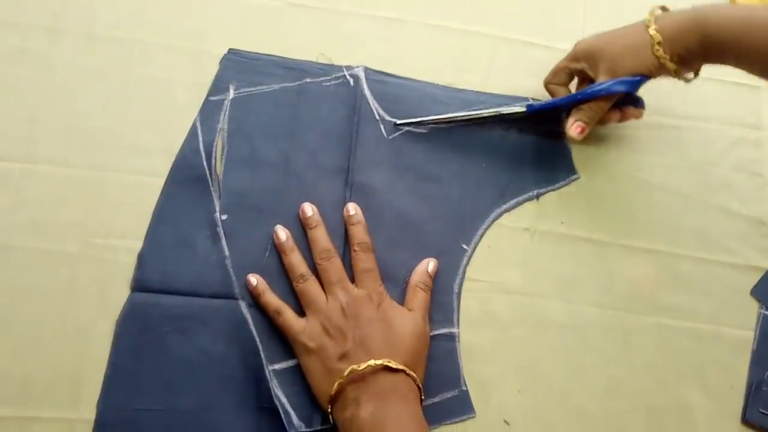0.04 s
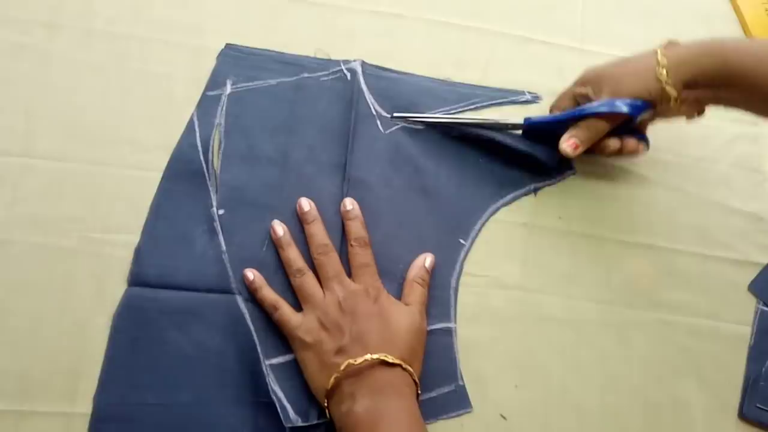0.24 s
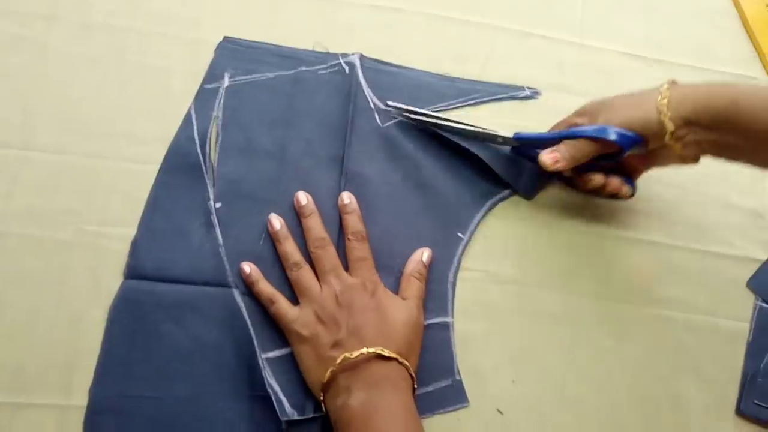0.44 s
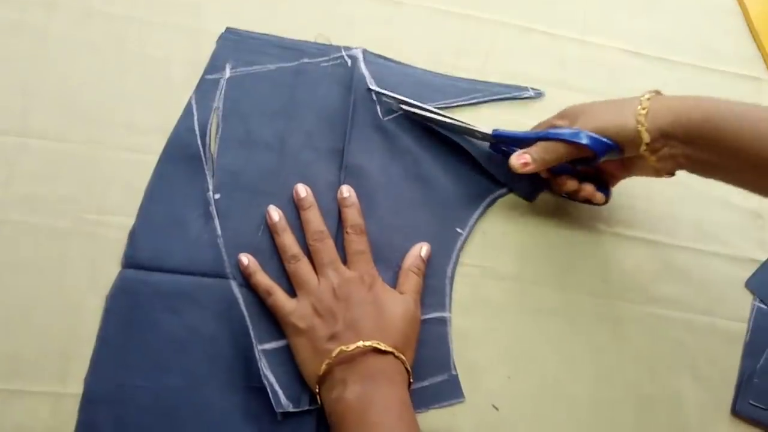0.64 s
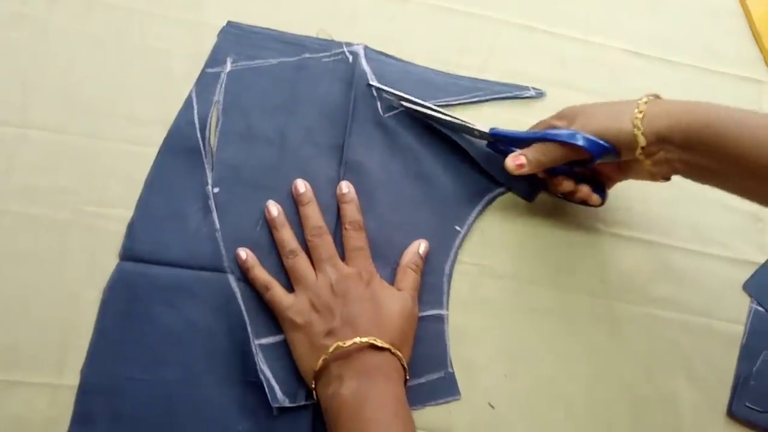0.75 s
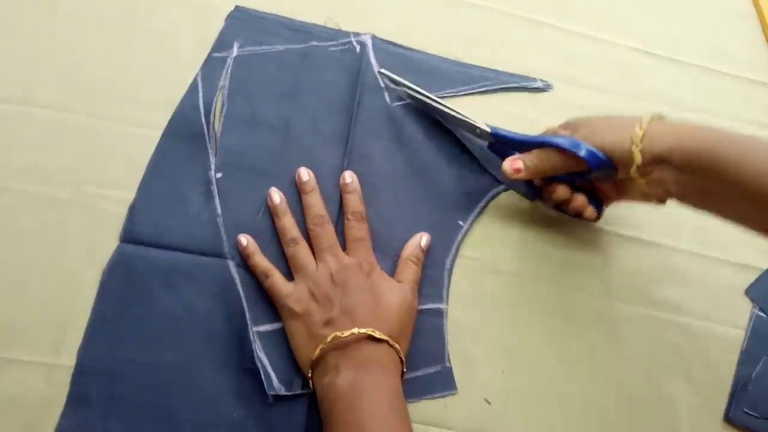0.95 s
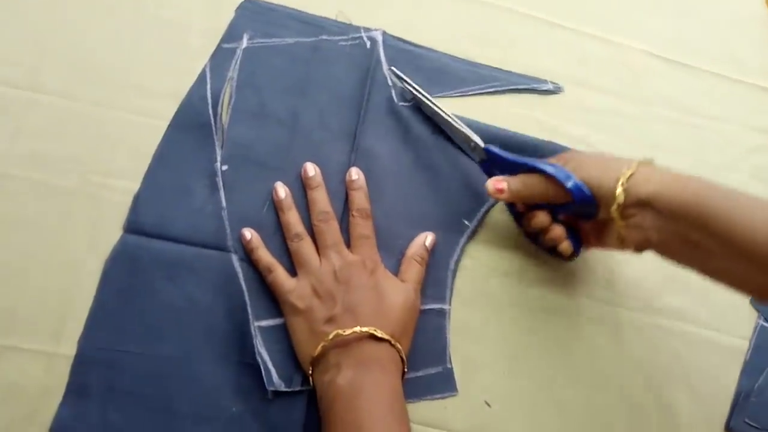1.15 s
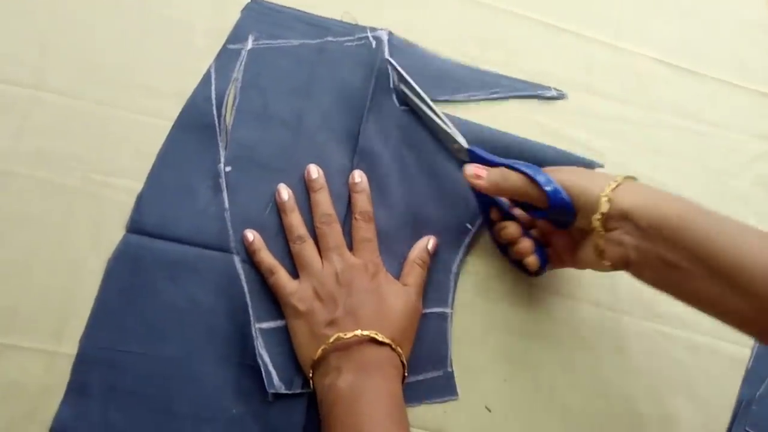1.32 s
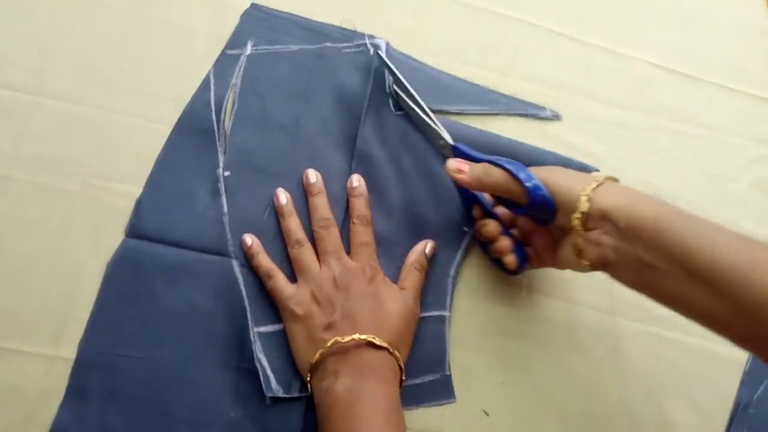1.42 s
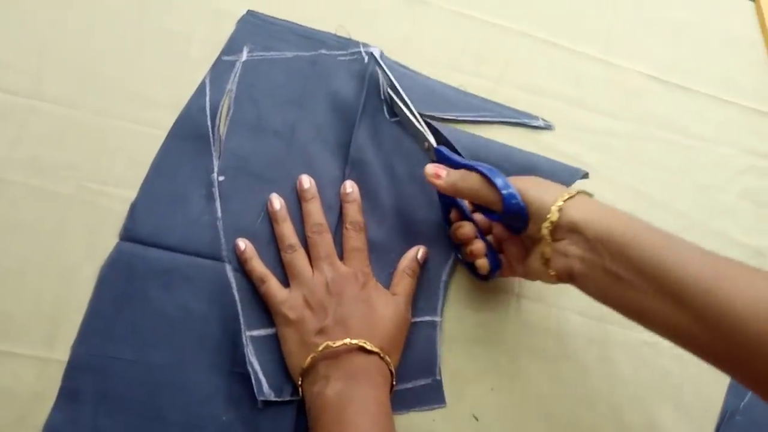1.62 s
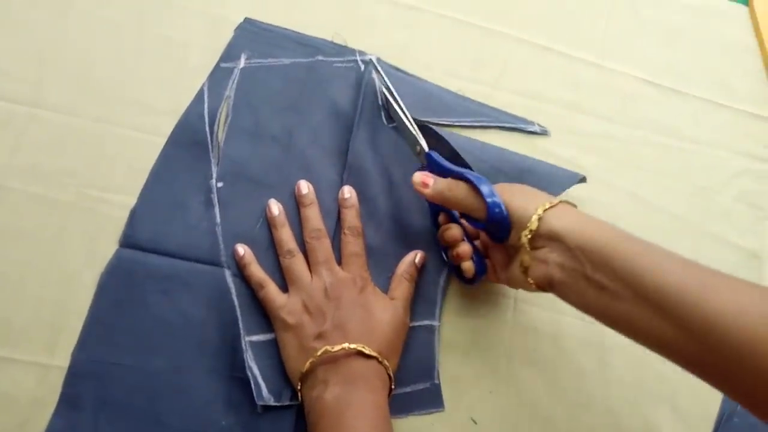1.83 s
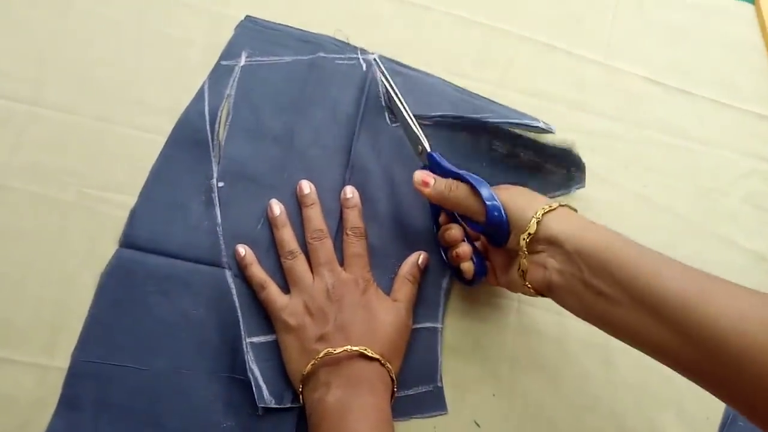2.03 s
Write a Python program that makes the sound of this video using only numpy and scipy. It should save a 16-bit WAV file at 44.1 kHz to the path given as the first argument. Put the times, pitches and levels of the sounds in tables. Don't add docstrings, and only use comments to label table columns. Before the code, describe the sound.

Tailoring scissors cut cloth on a hollow table in three uneven bursts of crunchy snips, with steel rubbing, dragging cloth and dull hand thumps between them, picked up close by a phone in a quiet room.

```python
import sys
import numpy as np
from scipy import signal
from scipy.fft import rfft, irfft
from scipy.io import wavfile
from scipy.ndimage import uniform_filter1d

SR = 44100
rng = np.random.default_rng(int(sys.argv[2]) if len(sys.argv) > 2 else 0)


def wrap_up_sound(samples):
    columns = np.atleast_2d(samples).T
    tamed = np.clip(columns, -1, 1)
    steps = np.round(tamed * 32767).astype(np.int16)
    wavfile.write(sys.argv[1], SR, steps)


def gain_from_db(level_db):
    decades = np.asarray(level_db, float) / 20
    return 10 ** decades


N = 91507

# f/Hz, level/dB
ROOM_TONE = [(25, -26), (55, -1.5), (105, 5.5), (190, -9), (330, -24), (1500, -23), (7900, -49)]
# t/s, f/Hz
PIVOT_SQUEAK = [
    (1.944, 14250),
    (1.975, 14950),
    (2.0, 14600),
    (2.038, 13750),
]
# t/s, level/dB, share of the low blade notes/dB
BLADE_RUB = [(0, -60.5, -9), (.2, -70.5, 1), (.38, -69, -6.5), (.45, -73, -3.5), (.66, -74.5, -2.5),
             (.69, -67, 1), (1.28, -65.5, -2.5), (1.31, -62.5, -23), (1.35, -64.5, -1), (1.5, -68, -1.5),
             (1.56, -70.5, -13), (1.621, -63.5, -19), (1.645, -67, 6), (1.7, -67, 5), (1.74, -65.5, 1),
             (1.93, -61, -2), (2.07, -68, 5)]
# t/s, level/dB
CLOTH_DRAG = [(0, -54.5), (.12, -59.5), (0.362, -64), (0.682, -64.5), (0.781, -58.5), (.95, -61),
              (1.13, -58.5), (1.218, -63.5), (1.7, -62.5), (1.9, -62), (2.07, -61)]
# t/s, level/dB
FIBRE_CRACKLE = [(0.77, -105), (0.83, -87), (0.96, -91), (0.985, -105), (1.0, -100), (1.03, -77),
                 (1.12, -87), (1.16, -105), (1.7, -105), (1.73, -91), (1.9, -80), (1.95, -105)]
# t/s, level/dB, length/s
EDGE_SLIDES = [
    (0.365, -71.5, 0.044),
    (1.222, -68, 0.049),
]
# t/s, tip level/dB, body level/dB,
# length/s, body f/Hz
CLOTH_BRUSHES = [
    (0.36, -86.5, -66, 0.037, 5000),
    (1.217, -81.5, -65, 0.032, 4350),
    (1.243, -75.5, -70, 0.024, 4900),
    (0.782, -82, -74, 0.016, 4800),
    (0.875, -82, -82, 0.015, 5500),
    (1.932, -100, -76.5, 0.07, 1970),
    (1.615, -105, -73, 0.064, 2810),
    (1.834, -100, -56, 0.0076, 3930),
    (2.031, -95, -67, 0.022, 4140),
]
# t/s, level/dB, f/Hz, length/s
HAND_THUMPS = [(0.014, -44.5, 170, 0.053), (0.044, -35.5, 166.5, 0.033), (0.089, -50, 162, 0.058),
               (0.129, -49, 105, 0.014), (0.199, -54.5, 142.7, 0.11), (0.291, -41.5, 143.2, 0.037),
               (0.329, -53, 173.4, 0.044), (0.429, -60, 155, 0.045), (0.51, -59, 105, 0.05),
               (0.532, -53.5, 97, 0.021), (0.619, -81.5, 101, 0.028), (0.763, -51.5, 62, 0.051),
               (0.825, -36, 109, 0.037), (0.859, -40, 67, 0.039), (0.889, -49.5, 113, 0.11),
               (1.013, -37, 167, 0.051), (1.04, -42.5, 88.5, 0.068), (1.129, -42.5, 158, 0.022),
               (1.192, -46, 80, 0.038), (1.244, -42.5, 80.4, 0.025), (1.292, -47.5, 64.8, 0.067),
               (1.332, -53, 55.3, 0.091), (1.551, -49.5, 103.4, 0.046), (1.634, -48, 121, 0.074),
               (1.725, -48, 108.9, 0.11), (1.799, -43, 137.3, 0.064), (1.841, -41.5, 100, 0.057),
               (1.861, -38, 106.6, 0.053), (1.894, -34.5, 149, 0.016), (1.929, -43.5, 125.5, 0.036)]
# t/s, blade-tip level/dB, blade-body level/dB, table level/dB
QUICK_BITES = [(0.0164, -49, -43, -33.5), (0.0466, -41, -41.5, -33), (0.0742, -60, -69, -44),
               (0.142, -38, -53, -40.5), (0.2778, -40.5, -55, -42), (0.908, -47, -60, -41.5),
               (0.9443, -54, -69, -46), (1.0051, -48, -54.5, -44.5), (1.0518, -51, -48.5, -36),
               (1.1007, -47.5, -58, -50.5), (1.7624, -47, -72, -53.5), (1.836, -46, -59, -52),
               (1.8498, -60, -60, -87), (1.8604, -42, -45, -48.5), (1.9001, -45, -51.5, -47)]
QUICK_LENGTHS = [13, 11, 11, 12, 9, 12, 4, 12, 6, 9, 6, 6, 4, 11, 6]
# t/s, blade-tip level/dB, blade-body level/dB, table level/dB
LONG_BITES = [
    (0.8246, -36, -57, -37.5),
    (0.848, -44.5, -56.5, -41),
    (1.0203, -41, -46, -32.5),
    (1.061, -38, -49, -38),
    (1.08, -51, -59.5, -41),
    (1.7324, -41.5, -68, -49.5),
    (1.7857, -41, -60.5, -48),
    (1.8075, -51, -71, -77),
    (1.8773, -42.5, -45.5, -47.5),
]
LONG_LENGTHS = [18, 22, 16, 17, 13, 22, 16, 22, 20]
# shares of blade edge/dB, low, middle and top table notes/dB
BITE_COLOURS = [(-3.5, 2.5, 0, 4.5), (-5, 1, -13, -2), (-4, -6, -6, -2.5), (0, -0.5, -0.5, -4.5),
                (7.5, 1.5, -7.5, 6), (1, 3.5, -6, -14), (2, -3, 2, -12), (0, 1, 0, -4), (-1, 2, -3, -3),
                (-1, -2, -1, -6), (-5, 1, 0, -2), (-8, 1, 1, -3), (-9, 0, 5, -6), (-5, -3.5, -3.5, -2),
                (-3, 4, 0, -19), (-5, -5.5, 3.5, -3.5), (-7, -0.5, -2, 0.5), (-0.5, -6.5, 7, 3.5),
                (9.5, 2, -2, -1), (-1, -3, -18, -3), (-13, 3.5, -3.5, -1.5), (-15, 0, 1.5, -0.5),
                (-10, -3, -5, 0), (0.5, 0, 2, -6)]
# f/Hz, width/Hz, level/dB
TIP_NOTES = [(10600, 770, -5), (11480, 270, -6), (12100, 640, -6), (13920, 450, -2.5), (15380, 770, 3.5),
             (15070, 740, 4.5)]
# f/Hz, width/Hz, level/dB
BLADE_NOTES = [(2745, 246, -12.5), (3042, 190, -11.5), (3347, 250, -7), (4075, 370, -3), (4540, 147, 1.5),
               (4846, 340, 0.5), (5148, 326, 3), (5630, 110, -9), (5902, 44, -12.5), (6265, 55, -12.5)]
# f/Hz, width/Hz, level/dB
EDGE_NOTES = [(1900, 380, -19.5), (6486, 600, -2), (7790, 280, -15), (8960, 980, -12.5)]
# f/Hz, width/Hz, level/dB
TABLE_NOTES = [(170, 66, 0), (278, 61, 3.5), (427, 46, 0), (547.6, 41, -13.5), (666, 34, -7),
               (898.4, 45, -6.5), (934, 36, -16.5)]
# f/Hz, width/Hz, level/dB
BOARD_NOTES = [(65, 25, -8), (106, 20, 0), (153, 35, -3)]
# f/Hz, width/Hz, level/dB
CLOTH_NOTES = [(201.7, 36, -1), (268.7, 73, -6.5), (433, 94, -7), (559.5, 63, -9), (678, 44, -7),
               (764.5, 70, -8), (885, 83, -12.5), (1131, 110, -16.5), (1334, 70, -24), (1636, 100, -27)]
# f/Hz, width/Hz, level/dB
FIBRE_NOTES = [(11350, 350, -8), (13500, 600, -7), (14550, 320, -0.5)]
# f/Hz, width/Hz, level/dB
BRUSH_UPPER_NOTE = (6040, 320, -10.5)


def unit(x):
    return x / np.sqrt(np.mean(x ** 2) + 1e-30)


def ring(x, hz, width):
    b, a = signal.iirpeak(min(hz, 0.45 * SR), hz / width, fs=SR)
    return signal.lfilter(b, a, x)


def body(x, notes, colour_db=0):
    out = 0
    levels_db = np.array(notes)[:, 2] + colour_db
    for k, (hz, width, _) in enumerate(notes):
        tone = ring(ring(x, hz, width), hz, 3 * width)
        out = out + (-1) ** k * gain_from_db(levels_db[k]) / np.sqrt(width) * tone
    return out


def walk(rate):
    hold = int(SR / rate)
    steps = np.repeat(rng.standard_normal(N // hold + 1), hold)
    return 1.3 * uniform_filter1d(uniform_filter1d(steps, hold), hold)[:N]


def add(out, s, x):
    i = max(int(s * SR), 0)
    out[i:i + len(x)] += x[:N - i]


def strike(push, notes, db, length_s, colour_db=2.5):
    x = body(push, notes, colour_db * rng.standard_normal(len(notes)))
    main_part = x[:int((length_s + 0.004) * SR)]
    return gain_from_db(db) * x / np.sqrt(np.mean(main_part ** 2))


def friction(notes, flicker_db, rate, tilt_db):
    out = 0
    for (hz, width, db), extra_db in zip(notes, tilt_db):
        grit = rng.standard_normal(N) * gain_from_db(2 * rng.exponential(size=N))
        tone = unit(ring(ring(grit, hz, width), hz, 3 * width))
        out = out + gain_from_db(db + extra_db + flicker_db * walk(rate)) * tone
    return out


def room():
    f = np.maximum(np.fft.rfftfreq(N, 1 / SR), 1)
    hz, db = np.array(ROOM_TONE).T
    spectrum = rfft(rng.standard_normal(N)) * gain_from_db(np.interp(np.log(f), np.log(hz), db))
    tone = unit(irfft(spectrum, N))
    hiss = unit(body(rng.standard_normal(N), [(15440, 730, 32), (9300, 7000, 3.0)]))
    return gain_from_db(-66 + 2 * walk(16)) * tone + gain_from_db(-101 + 0.75 * walk(9.4)) * hiss


def squeak(t):
    s, hz = np.array(PIVOT_SQUEAK).T
    shape = np.clip(np.minimum(t - s[0], s[-1] - t) / 0.015, 0, 1)
    whistle = np.sin(2 * np.pi * np.cumsum(np.interp(t, s, hz)) / SR)
    return gain_from_db(-91 + 2.5 * walk(60)) * shape * whistle


def rubbing(t):
    rub_s, rub_db, low_db = np.array(BLADE_RUB).T
    drag_s, drag_db = np.array(CLOTH_DRAG).T
    rub_level = np.interp(t, rub_s, rub_db)
    drag_level = np.interp(t, drag_s, drag_db)
    low = np.interp(t, rub_s, low_db)
    weight = 2.03 * (drag_level + 62)
    steel_tilt = [low + 10, low + 5, low / 2 + 1, low / 4 + 4, -3, 0, -3, 3, 4, -8]
    cloth_tilt = [0, weight, weight, weight / 2] + [0] * len(CLOTH_NOTES)
    steel = friction(BLADE_NOTES, 3.0, 13.06, steel_tilt)
    cloth = friction(CLOTH_NOTES, 3.5, 16.165, cloth_tilt)
    return gain_from_db(rub_level - 10.5) * steel + gain_from_db(drag_level - 3.0) * cloth


def fibres(t):
    s, db = np.array(FIBRE_CRACKLE).T
    crackle = friction(FIBRE_NOTES, 2.6, 54, [0] * len(FIBRE_NOTES))
    return gain_from_db(np.interp(t, s, db) + 2.8 * walk(90)) * crackle


def slides():
    out, t = np.zeros(N), np.arange(3000) / SR
    from_hz, to_hz, settle_s, width_hz = 8900, 7530, 0.0082, 290
    hz = to_hz + (from_hz - to_hz) * np.exp(-(t / settle_s) ** 2 / 2)
    for s, db, length_s in EDGE_SLIDES:
        grain = unit(uniform_filter1d(rng.standard_normal(len(t)), int(SR / width_hz)))
        swell = np.sin(np.pi * np.minimum(t / length_s, 1) ** 1.64)
        add(out, s, gain_from_db(db) * swell * grain * np.sin(2 * np.pi * np.cumsum(hz) / SR))
    return out


def brushes():
    out, t = np.zeros(N), np.arange(6000) / SR
    for s, tip_db, body_db, length_s, hz in CLOTH_BRUSHES:
        patchy = gain_from_db(2.5 * np.repeat(rng.standard_normal(30), 200))
        swell = np.sin(np.pi * np.minimum(t / (1.68 * length_s), 1)) ** 2
        push = rng.standard_normal(len(t)) * patchy * swell
        tips = strike(push, FIBRE_NOTES, tip_db, length_s)
        steel = strike(push, [(hz, 370, 0), BRUSH_UPPER_NOTE], body_db, length_s, 0)
        add(out, s, tips + steel)
    return out


def thumps():
    out, t = np.zeros(N), np.arange(6000) / SR
    for s, db, hz, length_s in HAND_THUMPS:
        u = t / np.clip(length_s, 0.008, 0.09)
        swing = np.sin(2 * np.pi * (hz * t + rng.random()))
        rough = gain_from_db(-5) * unit(body(rng.standard_normal(len(t)), BOARD_NOTES))
        shape = np.minimum(u / 0.12, 1) * np.exp(-u ** 2)
        add(out, s - 0.006, gain_from_db(db - 4) * shape * (swing + rough))
    return out


def flurry(length_s, attack_s):
    t = np.arange(6000) / SR
    snaps_per_s, spread_db, clump_db = 2200, 3.0, 2.5
    hit = rng.random(len(t)) < snaps_per_s / SR
    size = rng.exponential(size=len(t))
    noise = rng.standard_normal(len(t))
    clumps = uniform_filter1d(np.repeat(rng.standard_normal(50), 120), 60)
    snaps = unit(hit * gain_from_db(spread_db * size) * np.sign(noise) + 0.072 * noise)
    hold = np.exp(-(t / length_s) ** 3)
    tail = gain_from_db(-24) * np.exp(-t / 0.012)
    return snaps * gain_from_db(clump_db * clumps) * np.minimum(t / attack_s, 1) * (hold + tail)


def knock(push, db, low_db, middle_db, top_db, length_s):
    out, t = 0, np.arange(len(push)) / SR
    u = t / (length_s + 0.0032)
    swell = 4.8 * u * np.exp(-1.6 * u ** 2)
    for hz, width, note_db in TABLE_NOTES:
        level, detune, phase = rng.standard_normal(3)
        share_db = note_db + low_db * (230 < hz < 350) + middle_db * (350 < hz < 480) + top_db * (hz > 800)
        swing = swell * np.sin(2 * np.pi * hz * (1 + 0.035 * detune) * t + 9 * phase)
        rough = strike(push, [(hz, 2 * width, 0)], -5, length_s, 0)
        out = out + gain_from_db(share_db + 2.0 * level) * (swing + rough)
    return gain_from_db(db) * out


def bites():
    out, attack_s, table_lead_s = np.zeros(N), 0.0025, 0.002
    events = zip(QUICK_BITES + LONG_BITES, QUICK_LENGTHS + LONG_LENGTHS, BITE_COLOURS)
    for (s, tip_db, blade_db, table_db), ms, (edge_db, *shares_db) in events:
        length_s, start = ms / 1000, s - attack_s
        snaps = flurry(length_s, attack_s)
        push = flurry(1.315 * length_s, 1.46 * attack_s) + 0.4 * snaps
        edge = [(hz, width, db + edge_db) for hz, width, db in EDGE_NOTES]
        add(out, start, strike(snaps, TIP_NOTES, tip_db - 19.5, length_s))
        add(out, start, strike(push, BLADE_NOTES + edge, blade_db - 3.5, length_s))
        add(out, start - table_lead_s, knock(push, table_db - 15.5, *shares_db, length_s))
    return out


def scene():
    t = np.arange(N) / SR
    background = room() + squeak(t) + rubbing(t) + fibres(t)
    handling = slides() + brushes() + thumps()
    return (background + handling + bites())[None]


def roll_off(x):
    return signal.sosfilt(signal.butter(12, 16800, fs=SR, output="sos"), x)


def record(dry):
    low_pass = signal.ellip(8, 0.2, 40, 15950, fs=SR, output="sos")
    mix = signal.sosfilt(low_pass, dry)
    return roll_off(mix)


dry = scene()
out = record(dry)
wrap_up_sound(out)
```